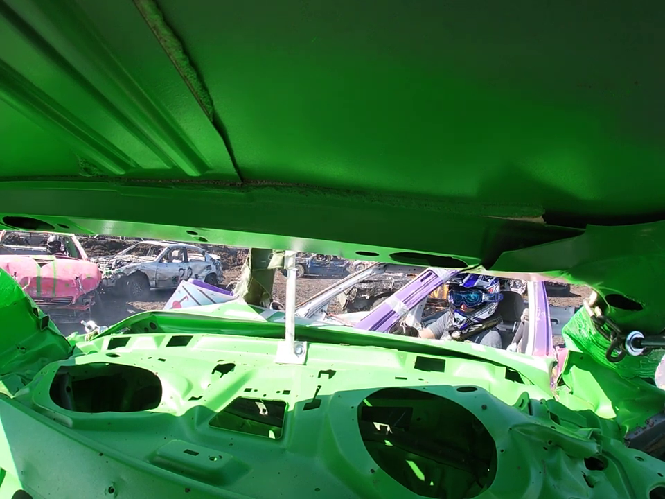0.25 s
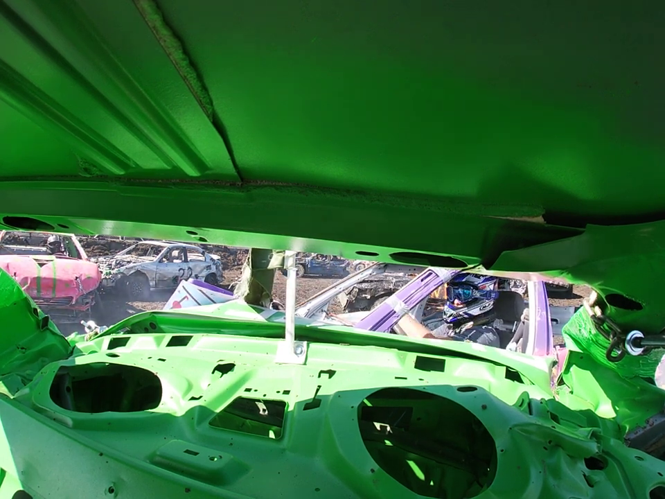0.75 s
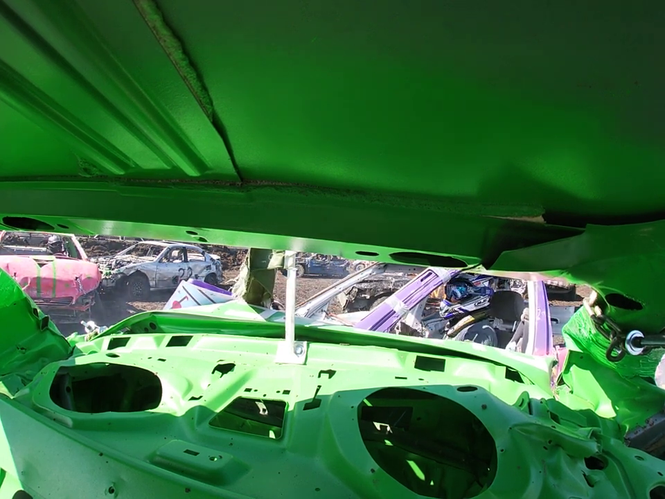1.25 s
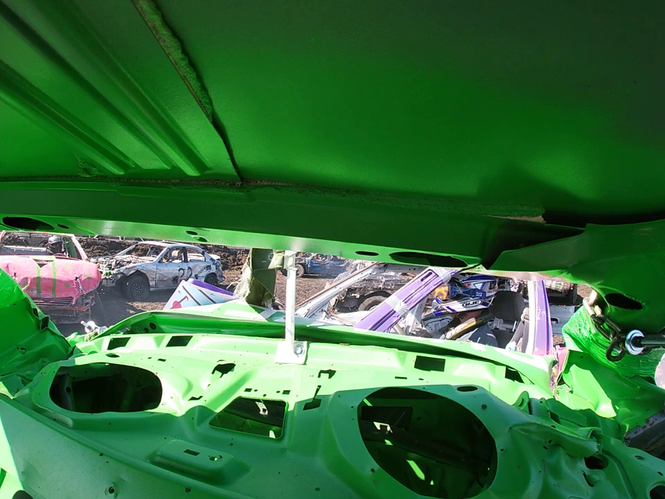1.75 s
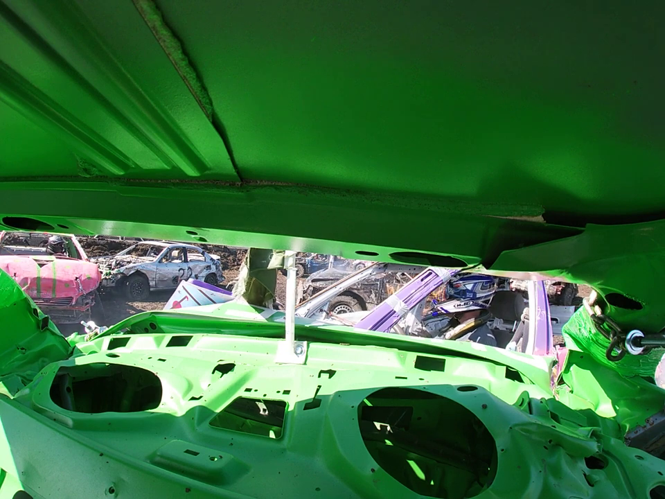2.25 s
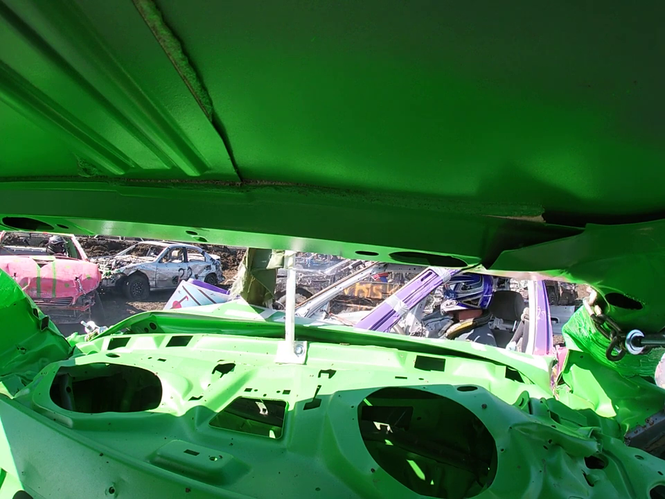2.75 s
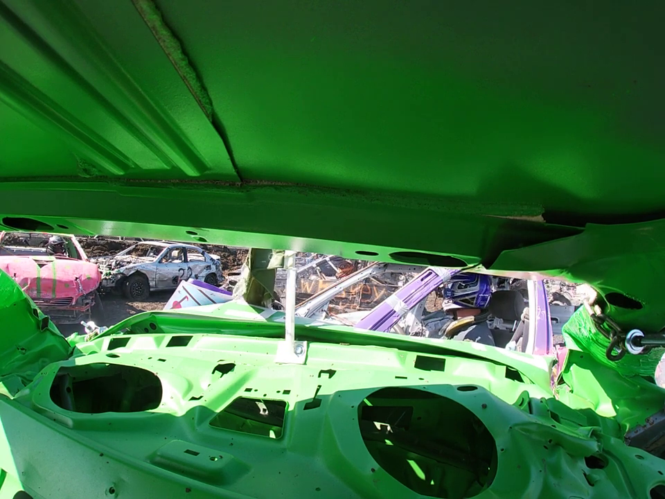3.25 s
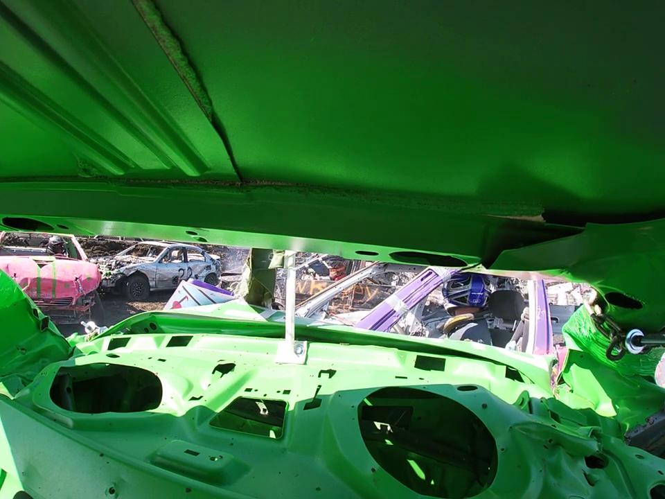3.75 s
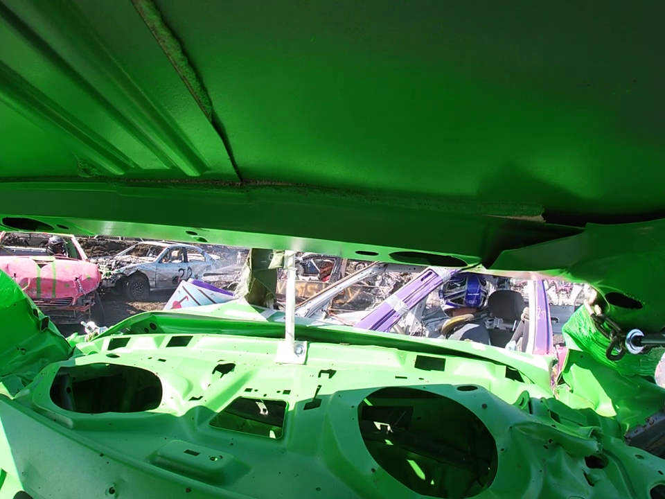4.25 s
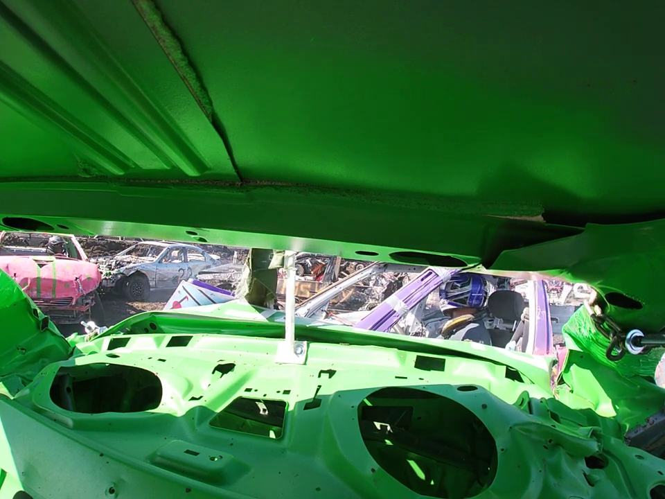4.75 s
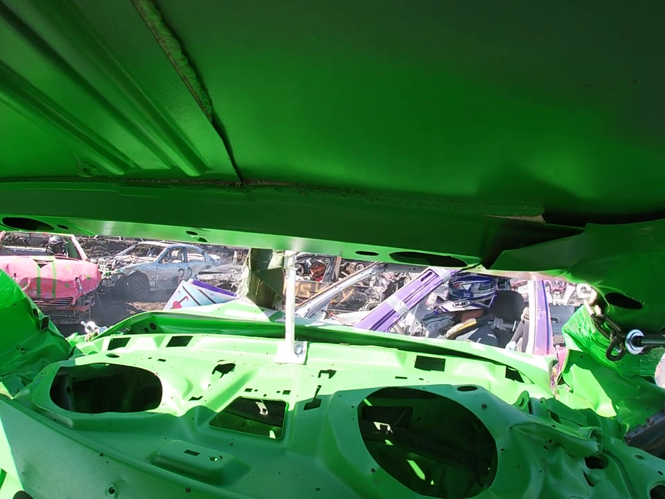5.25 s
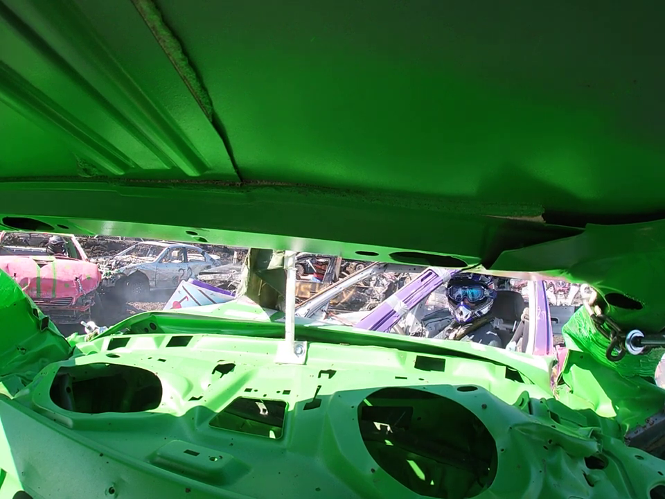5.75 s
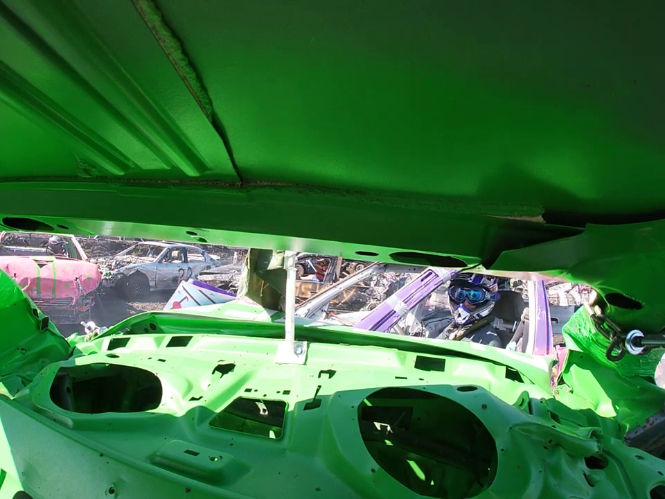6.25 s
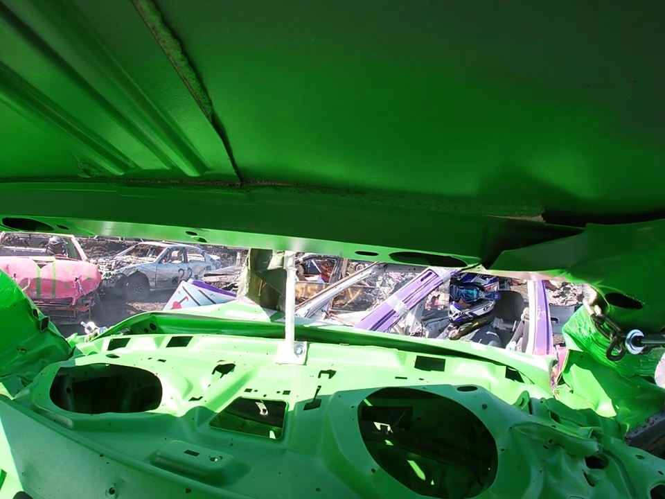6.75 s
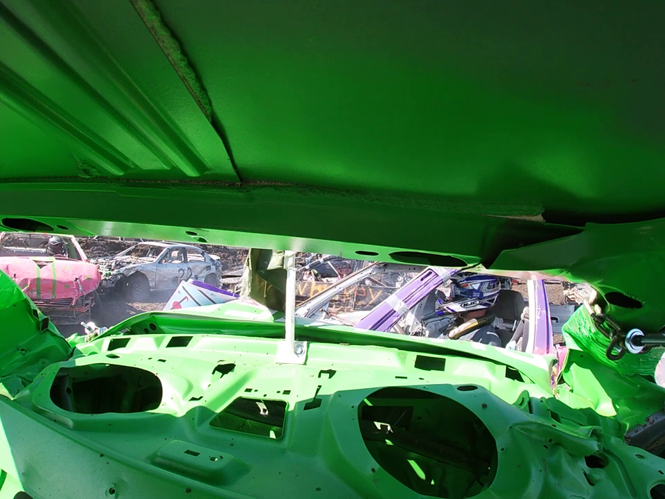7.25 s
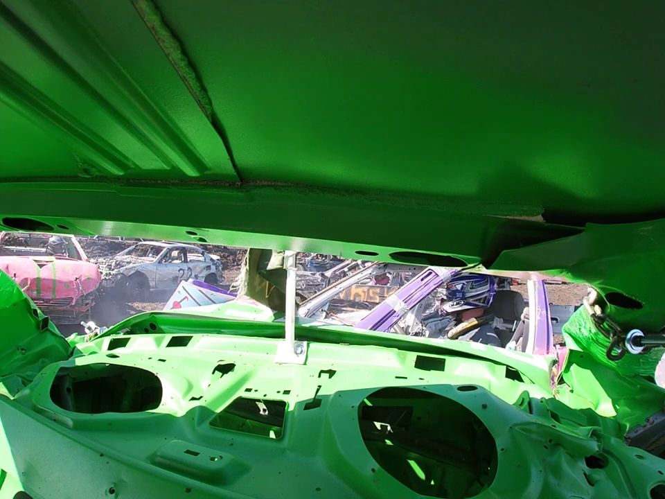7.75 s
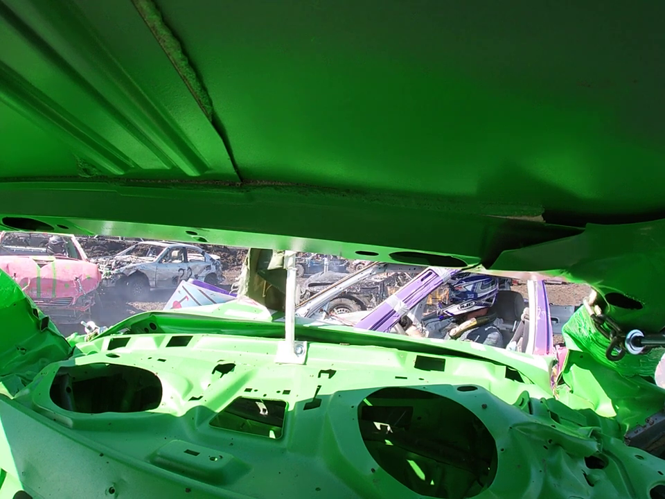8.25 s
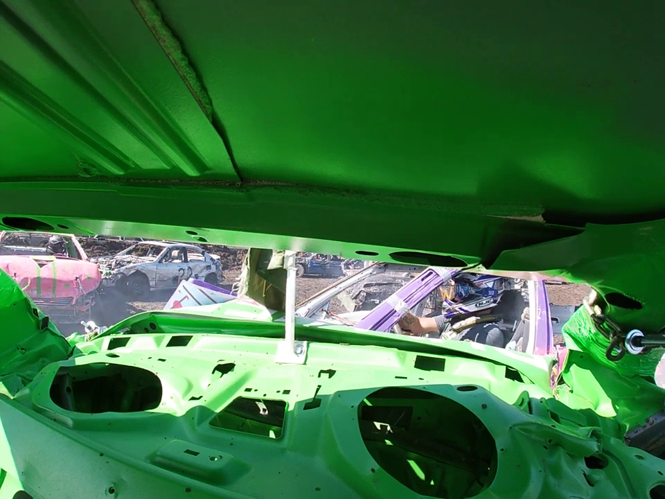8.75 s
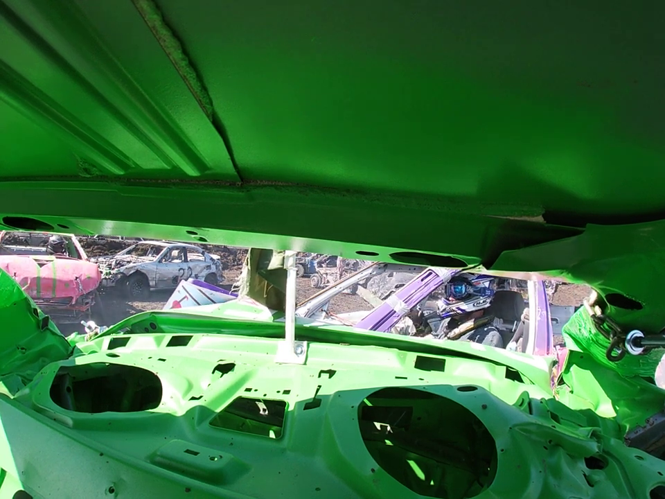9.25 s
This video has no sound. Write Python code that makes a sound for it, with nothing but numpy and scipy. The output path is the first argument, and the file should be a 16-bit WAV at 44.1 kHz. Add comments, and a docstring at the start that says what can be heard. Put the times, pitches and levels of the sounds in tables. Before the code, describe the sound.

The sound is heard from inside a stripped derby car. Its engine revs up with a deep boom and intake roar, peaking just after 1 second, then sinks to a lumpy idle by 3.5 seconds. From the start, neighbouring cars with open exhausts rev in turn, five times, at about 0, 1.5, 3.5, 5.3 and 6 seconds. Each rev thumps, barks and crackles, ringing the sheet metal. A loose panel gives a few faint rattles between 2.5 and 5 seconds. Distant engines rumble underneath throughout, growing stronger in the second half. The last rev is the loudest, popping hard from 6 to about 8.5 seconds, while a low hum briefly rises out of the rumble. It then drops to a slower sputter with more pops. After 9 seconds the car's own engine picks up again.

```python
"""Inside a stripped car at a derby. Its own engine blips up, a boom of sine firing orders and intake noise,
and sinks to a lumpy idle by 3.5 s. From the start, neighbours with open pipes rev in turn, five times:
each firing thumps, barks, crackles and rings sheet metal. A loose panel rattles between 2.5 and 5.1 s.
From 6 s the last, loudest rev pops hard and a hum rises briefly out of the far engines' steady presence.
After 9 s the own engine picks up again."""
import sys
import numpy as np
from scipy import signal
from scipy.io import wavfile
from scipy.ndimage import uniform_filter1d, map_coordinates

SR = 44100
rng = np.random.default_rng(int(sys.argv[2]) if len(sys.argv) > 2 else 0)


def wav_out(sig):
    """Save sig, one row per channel (or a flat mono array), as 16-bit PCM at SR to the path in sys.argv[1]."""
    wavfile.write(sys.argv[1], SR, np.round(np.clip(np.atleast_2d(sig).T, -1, 1) * 32767).astype(np.int16))


N = 419391

# (time [s], firing rate [Hz])
OWN_FIRING_RATE = [(0.0, 81.87), (0.21, 71.11), (0.4, 67.43), (0.58, 79.32), (0.98, 125.48), (1.2, 142.9),
                   (1.4, 135.87), (1.61, 121.52), (2.27, 83.7), (2.83, 59.6), (3.07, 51.13), (3.3, 45.63),
                   (3.6, 42.74), (4.7, 44.3), (5.6, 43.0), (6.6, 43.06), (7.2, 43.7), (8.0, 43.8),
                   (8.4, 45.6), (8.6, 44.2), (9.25, 49.09), (9.35, 55.03), (9.51, 70.28)]
# (time [s], throttle [0-1], order gain [dB])
OWN_THROTTLE = [(.14, 0, 4), (.42, 0.37, -1), (.58, 0.96, 5.5), (.72, 0.79, 8.5), (.98, 0.14, 0.5),
                (1.14, 0.5, 0), (1.4, 0.07, 2.5), (3.3, 0, 3), (3.6, 0, 0), (4.7, 0.01, 1.5),
                (6.3, 0.08, 1.4), (6.7, 0.47, -10), (7.9, 0.14, -1.5), (8.5, 0.25, -2), (9.18, 0.65, -11),
                (9.28, 0.9, -11), (9.4, 1, -7.5), (9.51, 0.76, 2.5)]


def own_engine():
    """Exhaust boom, puffs and intake roar, all following speed and throttle."""
    t = np.arange(N) / SR
    hz, = unroll(OWN_FIRING_RATE, t)
    throttle, level_db = unroll(OWN_THROTTLE, t)
    turns = np.cumsum(hz) / SR
    return exhaust_boom(turns, hz, throttle, level_db) + gas_noise(turns, hz, throttle)


# Throttle shut: (firing rate [Hz], order 1 [dB], order 2 [dB], order 3 [dB], order 4 [dB])
LOW_ORDERS = [(42.85, -33.5, -29, -23.5, -30), (47.36, -30.5, -15.5, -44.5, -34.5),
              (53, -43, -14.5, -48, -41), (58, -26, -13.5, -39.5, -44), (69.4, -16, -29, -35, -43.5),
              (76.7, -19, -34, -47.5, -57.5), (101.7, -12.5, -39, -42.5, -55),
              (113.8, -8.5, -36.5, -30.5, -43), (122.2, -11.5, -31.5, -31, -32.5),
              (140.2, -11.5, -23.5, -36.5, -47), (140.4, -13.5, -28, -37.5, -46)]
# Orders 1-4: (gain at full throttle [dB])
THROTTLE_GAIN_DB = [-7.5, 14.5, 21.5, 25.5]
# (order, level re order 4 [dB])
HIGH_ORDERS = [(5, -5), (6, -9), (7, -19), (8, -19), (9, -25), (10, -29), (11, -32), (12, -33), (13, -37)]
# Pipe resonances on the high orders: (frequency [Hz], gain [dB])
EXHAUST_RESPONSE = [(250, 0), (430, -0.5), (560, -2), (640, 1), (720, -13), (850, 2), (960, 2), (1080, -2),
                    (1250, 3), (1500, -4.5)]
# (order, idle level re order 2 [dB])
HALF_ORDERS = [(.5, -31), (1.5, -31), (2.5, -14), (3.5, -29)]


def exhaust_boom(turns, hz, throttle, level_db):
    """Harmonics of the firing rate; uneven cylinders add half orders that make the idle lope."""
    low_db = [db + level_db + open_db * throttle
              for db, open_db in zip(unroll(LOW_ORDERS, hz), THROTTLE_GAIN_DB)]
    out = sum(partial(turns, k + 1, db, waver_db=1.28) for k, db in enumerate(low_db))
    rise_hz_per_s = np.clip(uniform_filter1d(np.gradient(hz) * SR, SR // 10), -60, 40)
    snarl_db_per_order = .035 * rise_hz_per_s * np.clip((hz - 70) / 60, .1, 1)
    for k, db in HIGH_ORDERS:
        pipe_db, = unroll(EXHAUST_RESPONSE, k * hz)
        order_db = low_db[3] + db + pipe_db + (k - 4) * snarl_db_per_order
        out += partial(turns, k, order_db, waver_db=2.5 + .45 * (k - 3.5), waver_hz=18)
    lope_db = low_db[1] - .25 * (hz - hz.min())  # cylinders even out with speed
    return out + sum(partial(turns, k, lope_db + db, waver_db=2.5) for k, db in HALF_ORDERS)


# Both: (frequency [Hz], relative density [dB])
PUFF_SPECTRUM = [(900, -30.5), (1450, 2), (1800, -7), (2150, -0.5), (2600, -1.5), (3150, 0.5), (3700, -5),
                 (5000, -16.5), (6500, -28.5)]
ROAR_SPECTRUM = [(150, -19.5), (250, -3), (489, -8), (539, -7), (785, -24), (942, -18.5), (1450, -30.5),
                 (5540, -44), (7030, -59.5), (9140, -71.5), (15500, -120)]


def gas_noise(turns, hz, throttle):
    """One exhaust puff per firing over the intake roar; more air at speed and open throttle."""
    over_idle_hz = hz - hz.min()
    roar_db = -48.5 + .17 * over_idle_hz + 13 * throttle + 1.1 * wander(N, hz=24.3)
    puff_db = -73.5 + .1651 * over_idle_hz + 14 * throttle
    pulses = np.exp(-(turns % 1) / .31)
    pulses /= np.sqrt(np.mean(pulses ** 2))
    puffs = colour(pulses * rng.standard_normal(N), PUFF_SPECTRUM)
    roar = colour(rng.standard_normal(N), ROAR_SPECTRUM)
    return gain_of(puff_db) * puffs + gain_of(roar_db) * roar


# Per rev: (time [s], firing rate [Hz])
REV_FIRING_RATES = [
    [(0.0457, 28.13), (0.35, 49.66), (0.5, 54.2), (0.95, 56.0), (1.25, 61.99), (1.55, 60.32), (1.85, 64.35),
     (2.15, 59.37), (2.5, 57.34)],
    [(1.2954, 39.12), (1.6, 49.2), (2.13, 60.6), (2.4, 57.0), (3.0, 53.4), (3.3, 54.82)],
    [(3.2777, 43.3), (3.5, 48.22), (3.6, 60.93), (3.8, 68.93), (4.2, 74.14), (4.4, 72.91), (4.7, 58.0),
     (5.3, 59.7)],
    [(5.2173, 33.5), (5.45, 58.54), (5.55, 64.93), (5.7, 68.27), (5.85, 66.09), (6.0, 58.16), (6.15, 60.98),
     (6.5, 60.67)],
    [(5.7241, 26.72), (6.0, 31.8), (6.2, 41.58), (6.35, 42.55), (6.57, 53.68), (6.75, 62.17), (6.95, 64.91),
     (7.1, 66.36), (7.25, 66.65), (7.5, 65.39), (7.75, 66.76), (8.3, 62.0), (8.4, 57.65), (8.8, 34.0),
     (8.95, 35.0), (9.15, 37.79), (9.33, 35.08), (9.51, 35.87)],
]
# Per rev: (time [s], crackle level [dB])
REV_LEVELS = [
    [(0, -59), (.25, -50), (.5, -48.5), (.62, -45.5), (.85, -41.5), (1.1, -47), (1.4, -42), (1.749, -43),
     (2.002, -53), (2.5, -55.5)],
    [(1.3, -46.5), (1.6, -45), (1.901, -53.5), (2.2, -54.5), (2.5, -54), (2.75, -54), (2.829, -61.5),
     (3.3, -58.5)],
    [(3.28, -84), (3.45, -62.5), (3.59, -48), (4.1, -44), (4.42, -45), (4.62, -60.5), (5, -65.5),
     (5.3, -57)],
    [(5.22, -61), (5.32, -48.5), (5.5, -45), (5.85, -45), (6.05, -45), (6.5, -41.5)],
    [(5.72, -50), (5.9, -42), (6.5, -34), (7.4, -35.5), (7.7, -34), (8.39, -33.5), (8.46, -36.5),
     (8.5, -41.5), (8.6, -46.5), (8.679, -47.5), (8.77, -40), (8.9, -36.5), (9.3, -37.5), (9.4, -41),
     (9.51, -37.5)],
]
# Hard and missed firings, per rev: (time [s], nominal peak [dB], ring note [Hz])
REV_POPS = [
    [(0.0788, -45, 3020), (0.1396, -46, 3000), (0.1671, -39, 2740), (0.1955, -39, 4960),
     (0.2215, -41, 4260), (0.2674, -34.5, 2940), (0.3322, -38, 2730), (0.43, -44, 2930),
     (0.4494, -35.5, 2830)],
    [(1.9857, -45, 2360), (2.0037, -36, 2300), (2.0202, -39, 3870), (2.0716, -48.5, 2300),
     (2.088, -36, 2590), (2.2048, -39, 2530), (2.2886, -41, 2370), (2.323, -42, 3800),
     (2.3399, -36.5, 2360), (2.3569, -39, 2820)],
    [(3.6399, -37, 2730), (3.7915, -34, 2620), (3.8349, -34, 3230), (3.8928, -38, 4990),
     (3.9347, -33, 2870), (3.9766, -33, 3250), (4.004, -30, 2830), (4.0454, -35, 2820), (4.1557, -33, 2990),
     (4.1821, -30, 3120), (4.2225, -35, 2830), (4.2505, -29, 2650), (4.2634, -33, 3060),
     (4.3597, -34, 2820)],
    [],
    [(5.8995, -27, 2550), (6.0581, -22.5, 2830), (6.0861, -29.5, 3540), (6.1379, -20.5, 2740),
     (6.1644, -24, 5140), (6.2382, -17, 2740), (6.2622, -17.5, 2770), (6.334, -18.5, 2970),
     (6.3574, -22.5, 2700), (6.4023, -23, 2620), (6.4253, -19, 2740), (6.4467, -25, 2780),
     (6.5071, -19, 2770), (6.5266, -24, 2970), (6.5829, -18.5, 2960), (6.6009, -20.5, 2950),
     (6.7231, -22, 2820), (6.787, -21, 2760), (6.8503, -18, 3120), (6.8658, -22, 3080), (6.9735, -19, 2950),
     (7.0359, -25, 3000), (7.0963, -17, 2750), (7.1566, -23, 2710), (7.202, -22, 3150), (7.2619, -20, 3070),
     (7.3372, -20.5, 2950), (7.3976, -18.5, 3130), (7.4584, -18.5, 3170), (7.5353, -21, 3130),
     (7.5951, -23.5, 2690), (7.6256, -21, 3100), (7.7009, -16, 3600), (7.7468, -19, 2930),
     (7.7608, -16, 2800), (7.7762, -24, 2730), (7.8221, -22, 2540), (7.8825, -17, 2920),
     (7.8979, -14, 2970), (7.9588, -15, 3100), (8.0057, -15, 3850), (8.0222, -16, 2980),
     (8.0686, -17, 2300), (8.1155, -19, 3030), (8.1623, -17.5, 2550), (8.2427, -18, 2680),
     (8.2741, -20, 2500), (8.307, -18.5, 3830), (8.3394, -17.5, 5400), (8.3729, -18.5, 2530),
     (8.4078, -21, 2720), (8.4427, -24, 2710), (8.6894, -41, 2480), (8.7196, -28, 3720),
     (8.7454, -48, 2590), (8.7725, -27, 4600), (8.8318, -24.5, 2500), (8.8608, -25, 2400),
     (8.8887, -29, 5610), (8.9176, -24, 2580), (8.9451, -23.5, 3900), (8.974, -19.5, 2730),
     (9.0294, -23, 2730), (9.0573, -20.5, 2380), (9.0843, -16, 2560), (9.1386, -19, 2660),
     (9.1656, -21, 2460), (9.193, -22.5, 2580), (9.2189, -23.5, 5200), (9.2743, -20.5, 2560),
     (9.3023, -19.5, 2750), (9.3601, -28, 2610)],
]
# Base mix per rev: (near car [0/1], sizzle re crackle [dB], bark re crackle [dB], thump [dB],
# order 3 re thump [dB])
REV_MIXES = [(0, -16, 13.5, -30.5, 2), (1, -17.5, 8, -34.5, -1.5), (0, -16, 14.5, -23, 4.5),
             (0, -14.5, 14, -21.5, 3), (1, -16.5, 13, -22.5, 1)]


def neighbours():
    """Yields (start [s], sound) for each rev of the near and the far car."""
    for speed, levels, pops, balance in zip(REV_FIRING_RATES, REV_LEVELS, REV_POPS, REV_MIXES):
        yield speed[0][0], open_pipe_rev(speed, levels, pops, *balance)


# Four firings in turn: (strength [dB])
FIRING_CYCLE_DB = [-6, -6.5, -7, -8]
# Both: bark table, then crackle table, each (frequency [Hz], relative density [dB])
NEAR_SPECTRA = [(170, -37.5), (270, -3.5), (390, -9.5), (460, -0.5), (530, 4.5), (600, 7), (660, -7),
                (730, -13.5), (930, -19.5), (1300, -31), (1700, -28.5), (2400, -61)], [(530, -34), (900, 7),
                (1060, -3), (1150, -3.5), (1200, -1), (1690, -3), (1970, -6), (2970, -7), (3380, -13.5),
                (3750, -8.5), (4380, -10), (6020, -10), (7030, -57), (9140, -48.5), (15500, -120)]
FAR_SPECTRA = [(150, -38), (260, 4), (356, -4.5), (447, 1), (522, -4.5), (600, -1), (731, -20.5), (822, 0),
               (1170, -43), (1500, -40), (1950, -59.5), (3300, -120)], [(590, -23.5), (1000, 4), (1080, -5),
               (1420, -2.5), (1700, -5.5), (2300, -6.5), (3130, -8), (3510, -10), (4420, -11), (5590, -8),
               (7030, -23.5), (9140, -42), (15500, -120)]
CRUISE_HZ, CREST_DB = 66.5, 18.5


def open_pipe_rev(speed, levels, pops, near, sizzle_db, bark_db, thump_db, third_db):
    """Each firing of an open pipe: a low thump, a sharp bark and a spit of noise that dies away."""
    t = np.arange(speed[0][0], speed[-1][0], 1 / SR)
    hz, = unroll(speed, t)
    crackle_db, = unroll(levels, t)
    load_db = crackle_db - crackle_db.max()
    turns = np.cumsum(hz) / SR
    fired = np.flatnonzero(np.diff(np.floor(turns)))
    bark_spectrum, spit_spectrum = NEAR_SPECTRA if near else FAR_SPECTRA

    # Random scatter per firing.
    timing, burn, spit, shake, sharpness, aim = np.clip(rng.standard_normal((len(fired), 6)), -2, 2).T
    firing_db = np.resize(FIRING_CYCLE_DB, len(fired))
    pop_notes_hz = {}
    for s, peak_db, ring_hz in pops:
        i = np.argmin(abs(t[fired] - s))
        firing_db[i] = peak_db - CREST_DB - crackle_db[fired[i]]
        burn[i] = spit[i] = shake[i] = 0
        pop_notes_hz[i] = ring_hz
    at = np.clip(fired + (.00009 * SR * timing).astype(int), 0, len(hz) - 1)
    barks, spits, clangs, fronts = np.zeros((4, len(hz)))
    barks[at] = gain_of(.52 * firing_db + .18 + burn)
    spits[at] = gain_of(firing_db + .8 * burn + 2.6 * spit)
    clangs[at] = spits[at] * gain_of(4.5 * shake)
    fronts[at] = spits[at] * gain_of(4.5 * sharpness)

    echoes = convolve(spits, np.exp(-np.arange(SR // 8) / SR / .047))  # off the cars around
    wash = .0043 * uniform_filter1d(spits, SR // 8) * SR / hz
    gate = bursts(spits) + .17 * echoes + wash
    noise = rng.standard_normal((3, len(hz))) / np.sqrt(uniform_filter1d(gate ** 2, SR // 6) + 1e-9)
    spit_noise, sputter_noise = noise[0] * gate, noise[2] * gate

    blows = gain_of(firing_db + 7 + 3.4 * shake) * np.sqrt(SR / hz[fired])
    shaking = noise[2] * (2 * bursts(clangs, rise_s=.001, decay_s=.0031) + .25 * echoes)
    crackle = gain_of(-1.5) * colour(spit_noise, spit_spectrum)
    crackle += sheet_metal(near, hz, load_db, fired, blows, shaking, aim, pop_notes_hz)
    crackle += gain_of(sizzle_db) * sizzle(hz, load_db, fronts, echoes, noise[1])
    bark = gain_of(bark_db) * pipe_bark(near, hz, at, barks, bark_spectrum, spit_noise, sputter_noise)
    out = gain_of(crackle_db) * (crackle + bark) + body_thump(turns, hz, thump_db, third_db)
    return out * signal.windows.tukey(len(hz), .015)


# Both: (frequency [Hz], width [Hz], gain [dB])
NEAR_PIPE_MODES = [(322, 64, -8.5), (467, 75, -7), (526.4, 49, 1), (588.7, 46, 2.5), (742, 40, -13),
                   (765, 70, -22.5), (910, 140, -22.5)]
FAR_PIPE_MODES = [(340, 80, -3.5), (433, 18, -2), (505, 100, -2), (602, 54, 1.5), (746, 45, -16.5),
                  (813, 72, -7.5), (857, 67, -11.5), (955, 54, -19)]
KNOCK_HZ, KNOCK_WIDTH_S, KNOCK_DELAY_S = 670, .0011, .0018


def pipe_bark(near, hz, at, barks, spectrum, spit_noise, sputter_noise):
    """Each pulse barks, rings the pipe and knocks with its pressure front; louder at speed."""
    pulses = barks * np.sqrt(SR / hz)
    rough = np.interp(hz, [40, 60], [.6, .17])  # slow running sputters
    bark = cabin(colour(np.sqrt(1 - rough ** 2) * pulses + rough * sputter_noise, spectrum))
    modes = NEAR_PIPE_MODES if near else FAR_PIPE_MODES
    notes = ring(.33 * spit_noise, at, .64 * pulses[at], modes, drift_db=1.5, drift_firings=15)
    lag_s = np.arange(SR // 100) / SR - KNOCK_DELAY_S
    swing = np.cos(2 * np.pi * KNOCK_HZ * lag_s) * np.exp(-(lag_s / KNOCK_WIDTH_S) ** 2)
    knock_db = (-6 if near else -12.5) + .16 * (hz - CRUISE_HZ)
    knock = gain_of(knock_db) * np.sqrt(SR / hz) * convolve(barks, swing / np.linalg.norm(swing))
    return gain_of(.32 * (hz - CRUISE_HZ)) * (gain_of(.5) * bark + notes + knock)


def cabin(x):
    """Quick reflections in the bare steel body smear each bark."""
    t = np.arange(SR // 10) / SR
    taps = rng.choice([-1., 1.], len(t)) * (rng.random(len(t)) < .03)
    taps *= np.exp(-t / .014) * (t > .0015)
    return x + gain_of(-13) * convolve(x, taps / np.linalg.norm(taps))


# All four: (frequency [Hz], width [Hz], gain [dB])
NEAR_PANEL_MODES = [(2407, 230, -9), (2675, 270, -4), (2890, 230, -4.5), (3130, 190, -7), (3710, 180, -9.5),
                    (5300, 700, -8), (6120, 500, -8.5), (6570, 570, -13)]
FAR_PANEL_MODES = [(2170, 110, -20), (2580, 90, -19), (2820, 76, -15), (3115, 84, -14.5),
                   (4060, 150, -21.5), (4900, 72, -15), (5350, 200, -19), (5300, 81, -14.5),
                   (5750, 200, -17), (6500, 300, -21.5)]
NEAR_BOOM_MODES = [(950, 63, -15.5), (1119, 45, -11.5), (1317, 39, -13.5), (1665, 58, -16)]
FAR_BOOM_MODES = [(913, 69, -4), (1740, 110, -18)]
CLEAN_BLOW_SHARE = .9


def sheet_metal(near, hz, load_db, fired, blows, shaking, aim, pop_notes_hz):
    """Cracks ring the panels, more at speed and load; large panels boom at any speed."""
    modes = NEAR_PANEL_MODES if near else FAR_PANEL_MODES
    note_hz = np.array(modes)[(abs(aim) * 1000).astype(int) % len(modes), 0]  # any panel may be hit
    for i, ring_hz in pop_notes_hz.items():
        note_hz[i] = ring_hz
    drive = np.sqrt(1 - CLEAN_BLOW_SHARE ** 2) * shaking, fired, CLEAN_BLOW_SHARE * blows
    panels = ring(*drive, modes, drift_db=3, drift_firings=5, note_hz=note_hz)
    boom = ring(*drive, NEAR_BOOM_MODES if near else FAR_BOOM_MODES, drift_db=3, drift_firings=5)
    return boom + gain_of(.33 * (hz - 65.5) + .72 * load_db) * panels


# (frequency [Hz], relative density [dB])
SIZZLE_SPECTRUM = [(5000, -30), (6900, -2), (7900, -11), (8700, -2), (9400, -11), (10700, -15),
                   (12400, -10), (13500, -21), (15200, -24), (16000, -60)]


def sizzle(hz, load_db, fronts, echoes, noise):
    """Treble hiss from the sharp front of each crack."""
    envelope = 2.7 * abs(bursts(fronts)) ** 1.6 + .082 * echoes
    return gain_of(-.08 * (hz - 65) + .45 * load_db) * colour(noise * envelope, SIZZLE_SPECTRUM)


# (order, level re thump [dB])
BODY_ORDERS = [(1, -2.5), (1.5, -12.5), (2, -2.5), (2.5, -13), (4, -5)]
# (frequency [Hz], gain [dB])
BODY_RESPONSE = [(30, -15.5), (60, 3), (85, 0), (112, 12), (135, -2), (165, -6), (200, -2), (225, -9.5),
                 (280, -22)]


def body_thump(turns, hz, thump_db, third_db):
    """A neighbour's low orders boom in the bare body, more at speed."""
    level_db = thump_db + .33 * (hz - CRUISE_HZ)
    return sum(partial(turns, k, level_db + db + unroll(BODY_RESPONSE, k * hz)[0], waver_db=.8)
               for k, db in BODY_ORDERS + [(3, third_db)])


# (time [s], nominal peak [dB])
PANEL_RATTLES = [(2.552, -39), (2.621, -43), (3.193, -47), (5.033, -42), (5.0685, -48)]


def rattle(peak_db):
    """A short buzz of loose sheet metal."""
    t = np.arange(SR // 16) / SR
    envelope = t / .0039 * np.exp(1 - t / .013)
    return gain_of(peak_db - 20.5) * colour(rng.standard_normal(len(t)) * envelope, FAR_SPECTRA[1])


# (time [s], level [dB])
RUMBLE_LEVEL = [(0, -23.5), (.7, -20.5), (1.5, -29.5), (2.5, -26), (3.3, -24.5), (4, -18), (5, -17),
                (6, -16.5), (7, -18.5), (8, -17), (8.8, -14), (9.51, -21)]
# (frequency [Hz], relative density [dB])
RUMBLE_SPECTRUM = [(18, -41.5), (30, -7.5), (97, 8.5), (155, -3), (178, -6), (267, -14), (356, -32.5),
                   (420, -54), (550, -80.5), (920, -120)]
# (time [s], nominal pitch [Hz], level [dB])
HUM = [(6.3, 88.5, -17), (6.5, 90.85, -12), (7.2, 88.25, -17), (7.5, 90.9, -22.5), (7.8, 89.3, -26),
       (8.1, 89, -46), (8.3, 90.5, -46)]


def far_engines():
    """The rest of the field blurs into a rumble; one hum stands out for a while."""
    rumble_db, = unroll(RUMBLE_LEVEL, np.arange(N) / SR)
    out = gain_of(rumble_db) * colour(rng.standard_normal(N), RUMBLE_SPECTRUM)
    hz, db = unroll(HUM, np.arange(HUM[0][0], HUM[-1][0], 1 / SR))
    hum = partial(np.cumsum(hz) / SR, .99, db, waver_db=5)
    add(out, HUM[0][0], hum * signal.windows.tukey(len(hz), .1))
    return out


def ring(noise, at, blows, modes, drift_db, drift_firings, note_hz=None):
    """Resonators driven by noise and drifting blows; modes near note_hz are struck hardest."""
    scatter = rng.standard_normal((len(at), len(modes)))
    drift = np.sqrt(drift_firings) * uniform_filter1d(scatter, drift_firings, axis=0)
    out = np.zeros(len(noise))
    for k, (hz, width_hz, db) in enumerate(modes):
        focus_db = 0 if note_hz is None else 3.5 - np.minimum(18 * abs(np.log2(hz / note_hz)), 16)
        drive = noise.copy()
        drive[at] += blows * gain_of(focus_db + drift_db * drift[:, k] - drift_db ** 2 / 9)
        radius, angle = np.exp(-np.pi * width_hz / SR), 2 * np.pi * hz / SR
        gain = (-1) ** k * gain_of(db) * np.sin(angle) * np.sqrt(2 - 2 * radius ** 2)
        out += signal.lfilter([gain], [1, -2 * radius * np.cos(angle), radius ** 2], drive)
    return signal.sosfilt(signal.butter(6, 6800, fs=SR, output="sos"), out)


def partial(turns, order, db, waver_db, waver_hz=9):
    """One engine order: a sine of wavering strength."""
    wave = np.sqrt(2) * np.sin(2 * np.pi * (order * turns + rng.random()))
    return gain_of(db + waver_db * wander(len(turns), waver_hz)) * wave


def wander(size, hz):
    """Smooth random drift, rms about 1."""
    knots = rng.standard_normal(int(size / SR * hz) + 3)
    return map_coordinates(knots, [np.arange(size) * hz / SR], order=3)


def bursts(impulses, rise_s=.0008, decay_s=.0018):
    """Gives each impulse a rise and a decay."""
    t = np.arange(SR // 8) / SR
    return convolve(impulses, np.exp(-t / decay_s) - np.exp(-t / rise_s))


def colour(x, spectrum):
    """Minimum-phase filter of unit energy."""
    hz, db = np.transpose(spectrum)
    bins_hz = abs(np.fft.fftfreq(8192, 1 / SR))
    bins_db = np.interp(np.log(bins_hz + 1), np.log(hz + 1), np.maximum(db, -100), -100, -100)
    response = np.exp(np.conj(signal.hilbert(np.log(gain_of(bins_db)))))
    taps = np.fft.ifft(response).real[:4096]
    return convolve(x, taps / np.linalg.norm(taps))


def convolve(x, taps):
    """Convolution cut to the input length."""
    return signal.oaconvolve(x, taps)[:len(x)]


def unroll(rows, x):
    """Table columns interpolated at x along the first."""
    axis, *columns = np.transpose(rows)
    return [np.interp(x, axis, column) for column in columns]


def gain_of(db):
    """Decibels to amplitude."""
    return 10 ** (np.asarray(db) / 20)


def add(mix, start_s, sound):
    """Mixes a sound in at start_s."""
    part = mix[round(start_s * SR):][:len(sound)]
    part += sound[:len(part)]


def scene():
    """All engines and the loose panel, mono."""
    mix = own_engine() + far_engines()
    for start_s, rev in neighbours():
        add(mix, start_s, rev)
    for start_s, peak_db in PANEL_RATTLES:
        add(mix, start_s, rattle(peak_db))
    return mix[None]


def record(dry):
    """Soft clip, then a 15.8 kHz low-pass."""
    lowpass = signal.firwin(511, 15800, window=("kaiser", 9), fs=SR)
    return signal.oaconvolve(np.tanh(dry), lowpass[None], "same")


dry = scene()
out = record(dry)
wav_out(out)
```